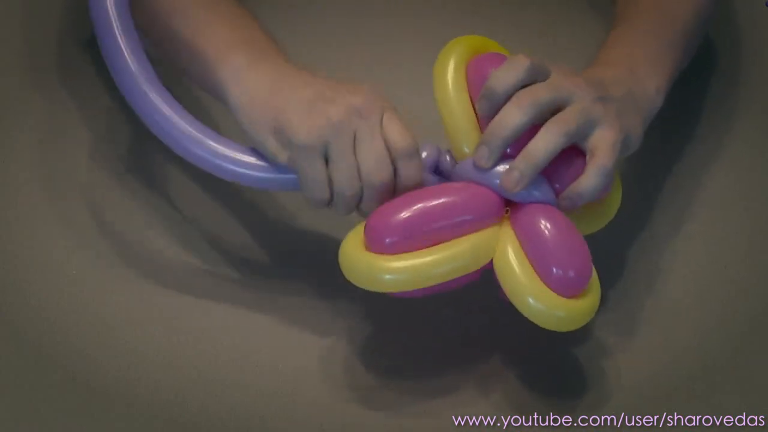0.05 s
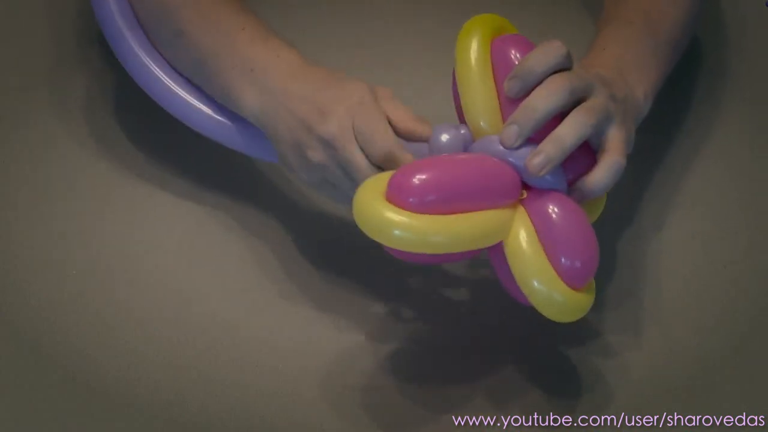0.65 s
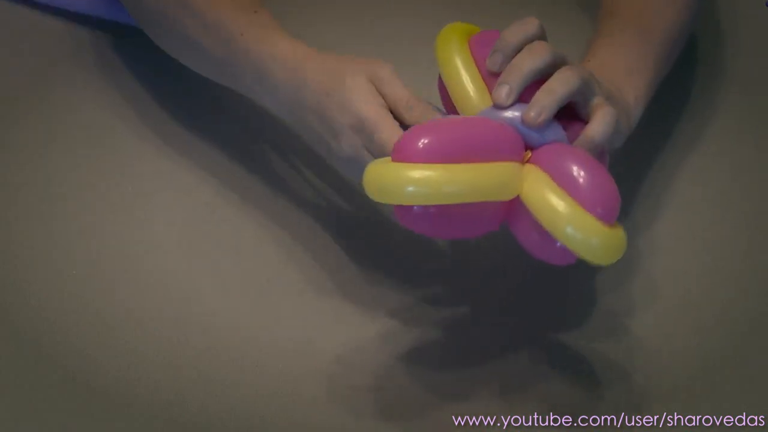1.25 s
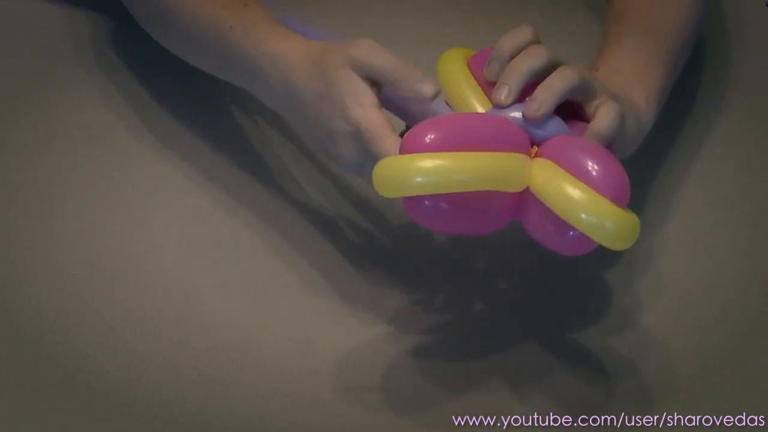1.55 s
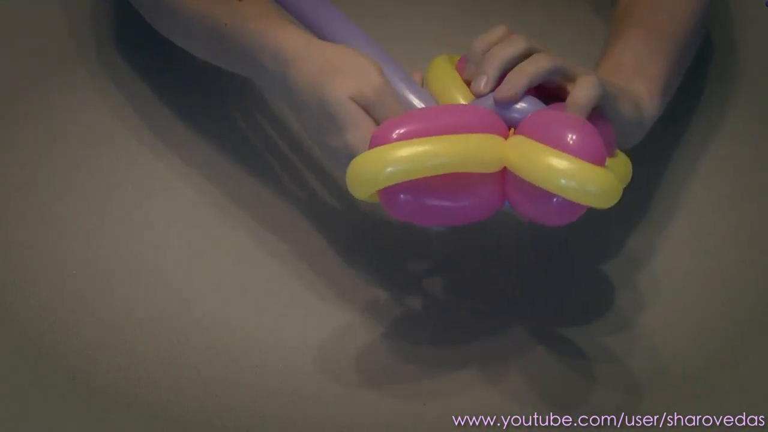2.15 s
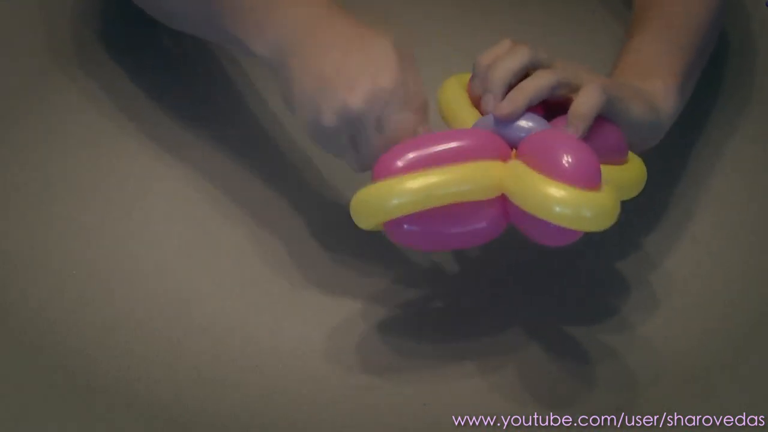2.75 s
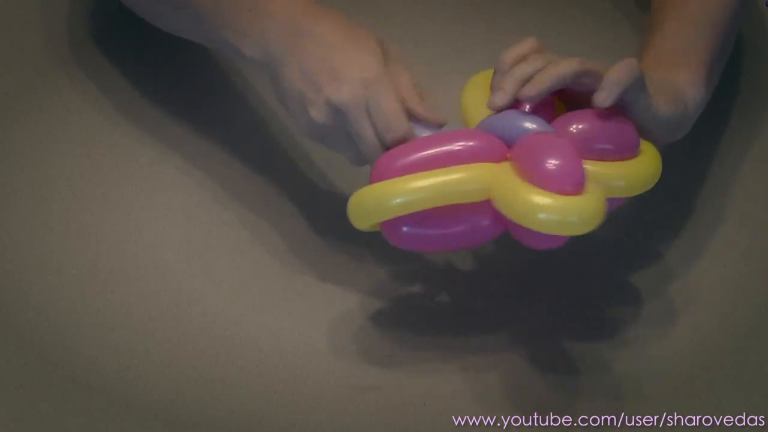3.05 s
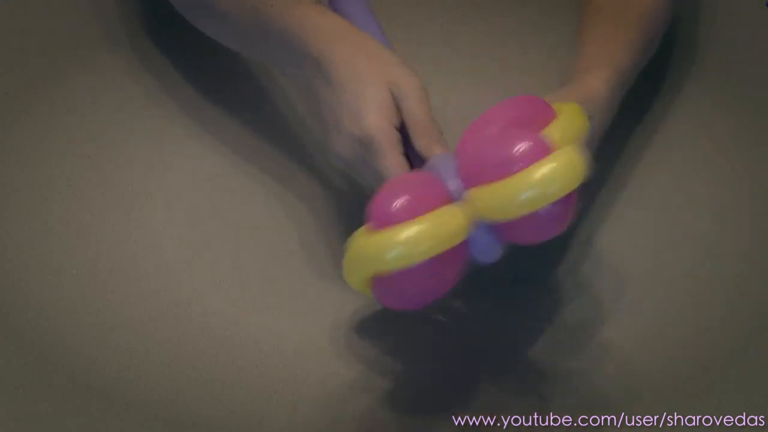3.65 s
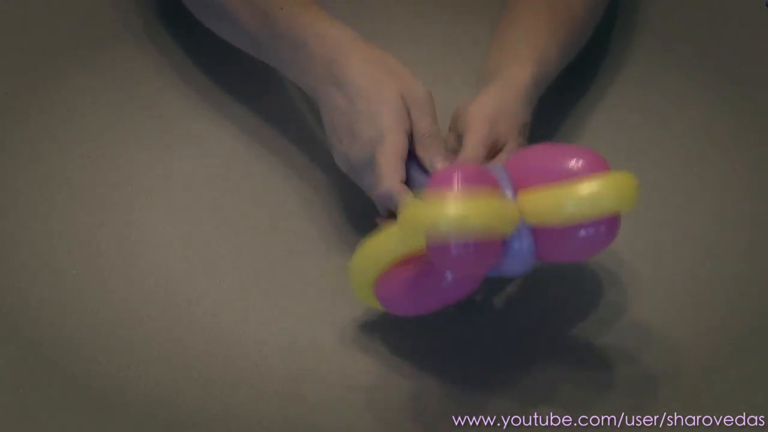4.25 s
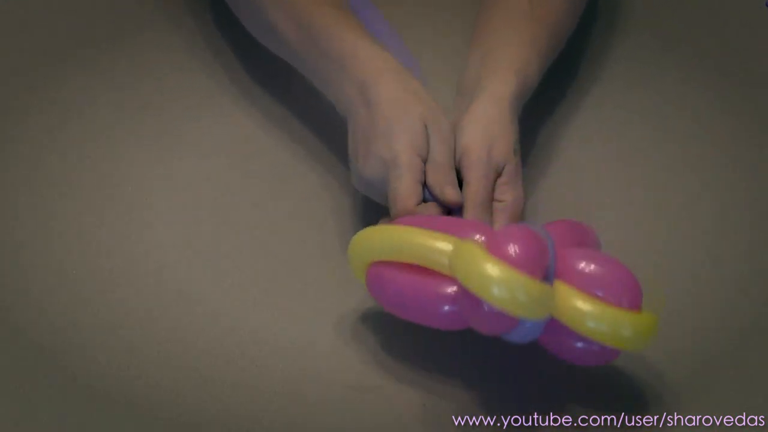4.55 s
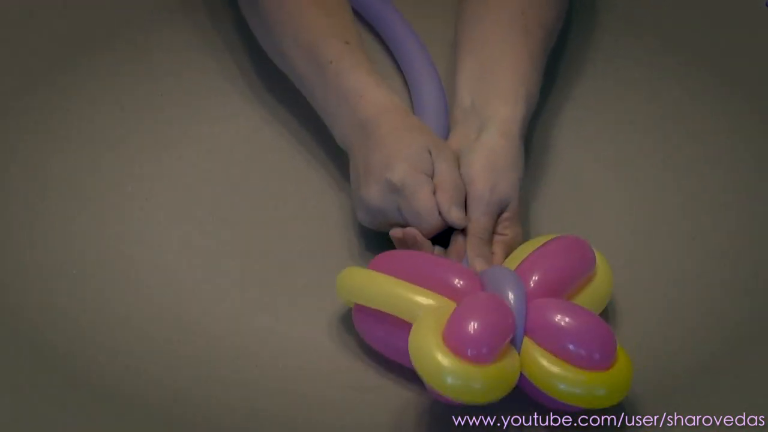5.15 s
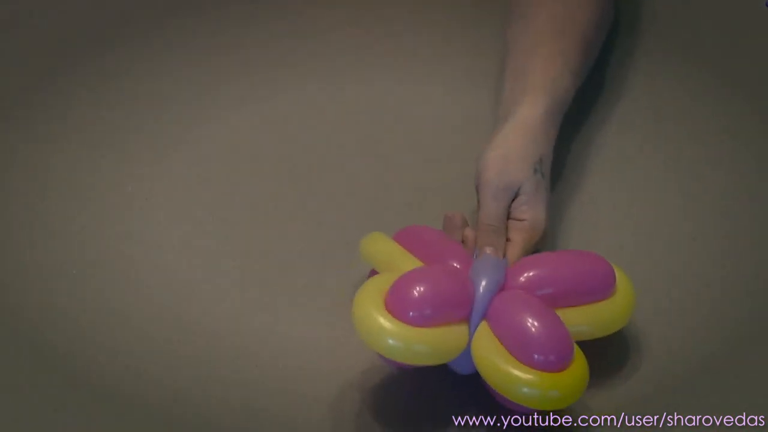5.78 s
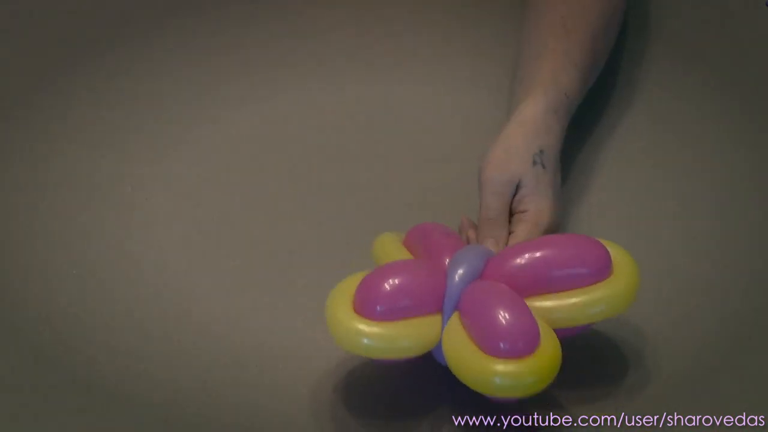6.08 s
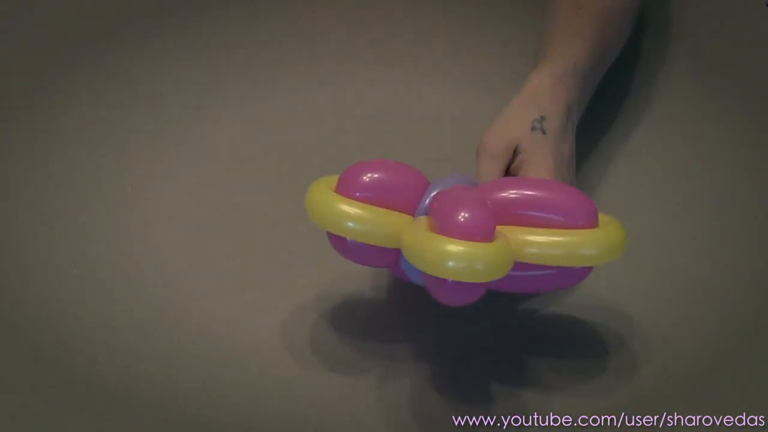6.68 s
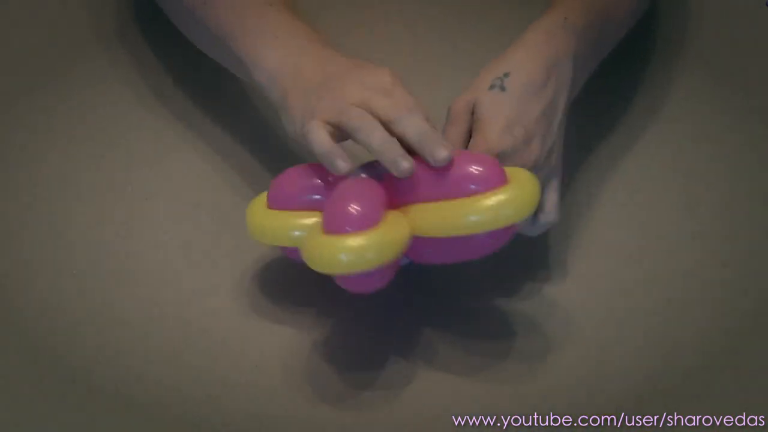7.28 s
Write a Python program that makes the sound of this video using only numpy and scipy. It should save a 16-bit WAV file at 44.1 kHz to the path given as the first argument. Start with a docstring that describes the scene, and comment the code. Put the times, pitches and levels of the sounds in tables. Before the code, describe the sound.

Latex balloons are pressed and twisted together, making a busy, creaky rubbing full of clicks, little squeaks and occasional thumping pops. The handling thins a little, then a loud snapping pop leads into a high, wavering squeal with a rough, grating middle. More rubbing and small snaps finish it. The sound is close, in a small room with a short echo and faint hiss.

```python
"""A small room, close microphone: hands twist a long latex balloon around a balloon figure.
The skins stick and slip: a creaking rub, single snaps, loud pops that thump the air inside.
Fast slips lock to a pitch as short squeaks and high squeals; irregular ones rasp.
A limiter ducks after the loudest pops."""
import sys
import numpy as np
from scipy import signal
from scipy.fft import rfft, irfft, next_fast_len
from scipy.io import wavfile
from scipy.ndimage import uniform_filter1d, map_coordinates

SR = 44100
rng = np.random.default_rng(int(sys.argv[2]) if len(sys.argv) > 2 else 0)


def to_wav(sig):
    """Store sig (one row per channel, or 1-D mono) as 16-bit WAV at the path in sys.argv[1].

    Samples outside -1..1 are clipped; the rate is SR.
    """
    pcm = np.clip(np.atleast_2d(sig), -1, 1) * 32767
    pcm = np.round(pcm).astype(np.int16)
    wavfile.write(sys.argv[1], SR, pcm.T)  # frames by channels


N = 322812
TIME_S = np.arange(N) / SR

# Levels in the tables are relative.
# Room noise spectrum: freq_hz, density_db
ROOM_NOISE_SPECTRUM = [(18, -54), (30, -7.5), (227, 4), (499, -9), (721, -27), (913, -0.5), (1430, -0.5),
                       (1540, -3), (2410, 5), (9970, -11), (16000, -17)]
# Room decay: freq_hz, t60_s
ROOM_DECAY = [(150, 0.38), (2500, 0.33), (12000, 0.33)]
# Taut skin spectrum: freq_hz, density_db
SKIN_SPECTRUM = [(900, -24), (1280, -9), (1440, 5), (1560, -6), (1800, 6), (2300, 5), (2800, 4.5),
                 (3500, 3.5), (4300, 0.5), (5200, -3.5), (6500, -11.5), (9000, -48.5)]
# Contact patch spectrum: freq_hz, density_db
SIZZLE_SPECTRUM = [(3000, -26), (5000, -1.5), (6500, -1), (8300, -3.5), (10200, 0.5), (12500, -10),
                   (16000, -10.5)]
# Resonances of the air inside: freq_hz, width_hz, level_db
AIR_MODES = [(181, 82, -4.5), (242, 60, 1.5), (369, 142, -2.5)]
# Resonances of the balloon bodies: freq_hz, width_hz, level_db
BODY_MODES = [(549, 66, -7), (740, 116, 1.5), (831, 81, 0.5), (1072, 270, -8)]
# Steady grip, keeps the skins rustling: time_s, skin_db, hollow_re_skin_db
GRIP_CURVE = [(0, -32, -1.5), (.36, -37, -2.5), (.73, -36.5, -4), (1.15, -35, -3), (1.42, -30.5, -8.5),
              (1.71, -36, -3), (2.05, -30.5, -7), (2.31, -32, -4.5), (2.45, -49, -2), (2.75, -32, -11),
              (3.38, -42, 7), (3.5, -40, -6.5), (4.15, -37.5, -2), (4.7, -40, -5), (5.15, -40, -6),
              (6.27, -44, -9.5), (6.7, -35.5, -1.5), (7.14, -51, 4.5)]
# Pushes that drag skin over skin: start_s, length_s, skin_db, hollow_re_skin_db, sizzle_re_skin_db
HAND_STROKES = [(0.162, 0.033, -29, -16, -5), (0.216, 0.1, -36.5, 1.5, -2.5),
                (.405, 0.088, -24, -6.5, -2.5), (0.579, 0.078, -31, -6, -3),
                (0.778, 0.047, -21.5, -11, -4.5), (0.945, 0.033, -22.5, -10, -5),
                (1.018, 0.077, -31.5, 0, -2), (1.198, 0.11, -29, -4, -3), (1.305, 0.06, -23.5, -10, -2),
                (1.532, .035, -23.5, -10, -10), (1.61, 0.08, -36, -6, -15), (1.746, 0.078, -22, -8.5, -5),
                (1.857, 0.036, -27.5, -8, -2), (1.907, 0.13, -26.5, -1.5, -1.5),
                (2.035, 0.025, -22, -8, -7), (2.096, .08, -35, -17, 6), (2.19, 0.043, -25.5, -3.5, -6),
                (2.264, .03, -24, -12, -11), (2.529, 0.019, -32, -6, -10),
                (2.612, 0.091, -29.5, -1.5, -5.5), (2.691, 0.088, -26.5, -12, -4),
                (2.774, 0.032, -26, -11, -3.5), (2.93, 0.02, -24.5, -6, -6), (3.04, 0.037, -32.5, -1, -7),
                (3.102, 0.024, -22.5, -12, -6), (3.169, 0.045, -29, -1, -8),
                (3.216, 0.048, -19.5, -7.5, -8), (3.28, 0.042, -30, -9, -1.5),
                (3.339, .05, -23.5, -1.5, -4), (3.518, .03, -31, -9.5, -9), (3.589, 0.022, -33, -27, -1.5),
                (3.744, 0.017, -16.5, -12, -9), (3.863, 0.07, -30.5, -5, -9.5),
                (3.992, 0.012, -28.5, 3, -4.5), (4.052, 0.014, -31, 1.5, -1),
                (4.223, 0.068, -30.5, -12, -6), (4.36, 0.016, -30, -27, -2), (4.449, 0.033, -19, -19, -4.5),
                (4.527, 0.048, -31, -25, -11), (4.835, 0.057, -32.5, -8, -13),
                (4.895, 0.047, -28.5, -2.5, -9), (6.159, 0.018, -26, -15, -3), (6.32, 0.088, -34, -7, -3),
                (6.422, 0.049, -32.5, -6, -6), (6.578, 0.13, -28, -5, 1.5), (6.753, 0.059, -27, -4, 3),
                (6.808, 0.12, -26, -7.5, 2), (6.974, .04, -35, -5, -0.5), (7.157, .02, -33.5, -16, -9.5),
                (7.225, .03, -29, -4, -8.5), (7.275, 0.054, -37.5, -0.5, -3.5)]
# One hard wrap, slowing as it seats: time_s, level_db, slip_rate_hz
CREAK_CURVE = [(4.451, -45, 520), (4.458, -13, 520), (4.487, -18.5, 400), (4.515, -16, 310),
               (4.538, -29, 226), (4.565, -21.5, 180), (4.6, -36, 160)]
# Spectrum of the creaking stretch of skin: freq_hz, density_db
CREAK_SKIN_SPECTRUM = [(900, -49), (1400, -15), (1800, -2), (2800, 2), (3500, 1.5), (4100, -21),
                       (5500, -15), (7500, -27), (10000, -13.5), (16000, -42)]
# Spectrum of the air shaken by the creak: freq_hz, density_db
CREAK_AIR_SPECTRUM = [(30, 0), (110, 5), (220, -10), (400, -28), (1200, -57)]
# Grating of the tight twist between squeals: start_s, length_s, level_db
RASP_STROKES = [(5.471, 0.018, -23.5), (5.503, 0.14, -31), (5.52, 0.037, -17.5), (5.561, 0.035, -24),
                (5.665, 0.087, -20.5), (5.763, 0.094, -22), (5.806, 0.085, -21)]
# Rasp spectrum: freq_hz, density_db
RASP_SPECTRUM = [(1100, -39), (1550, -22), (1850, -2.5), (2400, 1.5), (3200, -5.5), (4000, -1),
                 (4800, -9.5), (6000, -7.5), (8000, -14.5), (11000, -17.5), (16000, -23)]
# Short squeaks and low groans: start_s, length_s, first_hz, last_hz, level_db, roughness
SQUEAK_GLIDES = [(0.419, 0.035, 2920, 2680, -20, 0.4), (0.46, 0.023, 2710, 2670, -18.5, 0.45),
                 (0.826, 0.018, 2340, 2370, -18.5, 0.6), (1.199, 0.021, 1950, 1880, -23.5, 0.7),
                 (2.225, 0.015, 2946, 2690, -20.5, 0.7), (2.79, 0.066, 344, 346, -36.5, 0.3),
                 (2.934, 0.025, 5770, 5700, -24, 0.44), (3.373, 0.0079, 3090, 2880, -24, 0.5),
                 (3.529, 0.031, 2695, 2546, -30.5, 0.59), (3.753, 0.026, 1972, 2143, -18, 0.38),
                 (5.526, 0.038, 3320, 3185, -20, 0.7), (5.568, 0.062, 1903, 2070, -23, 0.17),
                 (5.654, 0.031, 7800, 6100, -25.5, 0.39), (5.68, 0.0124, 2443, 2260, -13, 0.75),
                 (5.691, 0.096, 2066, 1940, -23, 0.77), (5.692, 0.055, 3930, 3850, -25, 0.24),
                 (5.699, 0.084, 800, 794, -34, 0.6), (5.827, 0.059, 2500, 2666, -28.5, 1.01),
                 (6.586, 0.076, 277, 247, -33.5, .8), (6.758, 0.064, 226.5, 283, -29, 1.23)]
# Two long squeals, one list each: time_s, pitch_hz, fundamental_db, overtones_db, roughness
SQUEAL_CURVES = [
    [(5.28, 3290, -57, -44, 0.08), (5.325, 3300, -44, -26.5, 0.08), (5.365, 3420, -34, -27, 0.1),
     (5.382, 3430, -18, -23, .02), (5.41, 3413, -20, -26, 0.07), (5.435, 3424, -15, -20, 0.01),
     (5.455, 3180, -23, -21.5, .1), (5.473, 2916, -16, -22, 0.3), (5.488, 2890, -36, -32, 0.44)],
    [(5.845, 2906, -21, -42, 0.44), (5.87, 2710, -31, -21.5, 0.02), (5.895, 2690, -36, -25.5, 0.14),
     (5.95, 2663, -39, -37, 0.14), (6.07, 2720, -60, -52, .06)],
]
# Overtones, one list per squeal: level_db from the second harmonic up
SQUEAL_OVERTONES_DB = [
    [0, -5, -5],
    [1.5, -5.5, 0, -9],
]
# Single slips: start_s, kick_db, body_re_kick_db, sizzle_re_kick_db
SNAP_EVENTS = [(0.1742, -7.5, -5, -15), (.2627, -16, -3, 8.5), (.425, -8, -24, -14), (.5905, -15, -14, -2),
               (.7212, -24, -6, 5), (.7728, -11.5, -5, 5), (0.7894, -9, -2.5, 0), (0.7981, -3, -15, -3.5),
               (0.8236, 0, -10.5, -10), (0.8992, -4.5, -12.5, -4.5), (0.9539, -10, -13, -5),
               (1.0271, -10.5, -22, 4), (1.0382, -9, -5.5, -1), (1.085, -10.5, -7.5, 2),
               (1.1819, -9.5, -11, -3), (1.2064, -7, -12.5, -1.5), (1.2365, -10, -16, -10.5),
               (1.3022, -5.5, -4, -3), (1.3152, -11, -14, 2), (1.3332, -9, -20, 3), (1.5526, -12, -15, -17),
               (1.9241, -3, -14, -2), (2.2322, -5, -5, -14), (2.5376, -22, -9, -9), (2.6335, -13, -16, -8),
               (2.741, -0.5, -15, -16), (2.855, -4, -13.5, -2.5), (2.859, -6.5, -10, -7),
               (3.052, -5, -6, -3.5), (3.213, -9, -3, -3), (3.2489, -6.5, -3.5, -3.5),
               (3.2652, -4.5, -16, -5), (3.7506, -13, -1.5, -10), (4.0703, -10, -12, -0.5),
               (4.2377, -0.5, -9.5, -5.5), (4.275, -6.5, -25, -19), (4.281, -8, -27, -9),
               (4.554, -7.5, -30, -22), (4.5606, -7, -33, -19), (4.8575, -13, -28, -14),
               (5.6843, -1.5, -37, -22), (6.1688, -3.5, -14, -5.5), (6.176, -7.5, -20, -8),
               (6.4685, -22, -14, 8), (6.4969, -1, -14.5, -7), (6.7487, -10.5, -14, 4),
               (6.831, -5.5, -17, -14), (6.8957, -7.5, -8, -6), (6.9865, -13.5, -17, -2),
               (7.074, -18.5, -3.5, -5), (7.2768, -11, -28, -7)]
# A bubble jumps past its neighbour: start_s, crack_db, ring_hz, t60_s, thump_db, thump_hz, thump_delay_s
POP_EVENTS = [(0.4965, -8, 3080, 0.018, -1, 213, 0.00049), (1.4789, -6, 2870, .018, -2, 187, .0012),
              (2.1195, -11.5, 3520, 0.017, -13.5, 185, 0.0019),
              (2.7186, -2.5, 2780, 0.0069, -6.5, 170, 0.0014), (2.9343, -17, 1950, 0.12, -1, 162, 0.009),
              (5.2125, 10, 2940, 0.018, 4, 110, 0.0037)]

ATTACK_S, SAG_DB_PER_S, RELEASE_DB_PER_S = 0.013, 7, 333
SMALL_SNAPS_PER_S, SMALL_SNAP_DB, SMALL_SNAP_SPREAD_DB = 16, 14.5, 4.5
THUMP_RISE_S, THUMP_T60_S = 0.00069, 0.015
HIGHPASS_HZ, TOP_HZ = 45, 16000


def amp(db):
    """Decibels to gain."""
    return 10 ** (np.asarray(db) / 20)


def unit(x):
    """x at rms 1."""
    return x / np.sqrt(np.mean(x ** 2) + 1e-20)


def along(points, hz):
    """(freq_hz, value) points read on a log axis."""
    knots_hz, values = np.transpose(points)
    return np.interp(np.log(hz + 1), np.log(knots_hz + 1), values)


def curves(rows, t):
    """Each column after time_s, read at the times t."""
    time_s, *columns = np.transpose(rows)
    return [np.interp(t, time_s, column) for column in columns]


def wobble(rate_hz, size):
    """Smooth random curve, rate_hz knots a second."""
    knots = rng.standard_normal(int(size * rate_hz / SR) + 4)
    return map_coordinates(knots, [np.arange(size) * rate_hz / SR])


def add(track, start_s, x):
    """Mix x into the track."""
    part = track[max(round(start_s * SR), 0):][:len(x)]
    part += x[:len(part)]


def filtered(x, response):
    """x through a frequency response."""
    size = next_fast_len(len(x) + 8192)
    return irfft(rfft(x, size) * response(np.fft.rfftfreq(size, 1 / SR)), size)[:len(x)]


def convolve(x, impulse):
    """x through an impulse response, cut to N samples."""
    return signal.fftconvolve(x, impulse)[:N]


def minimum_phase(spectrum, size=2048):
    """Shortest impulse response with this spectrum; energy 1."""
    magnitude = amp(along(spectrum, np.fft.rfftfreq(size, 1 / SR)))
    cepstrum = irfft(np.log(magnitude + 1e-6))
    cepstrum[1:size // 2] *= 2
    cepstrum[size // 2 + 1:] = 0
    impulse = irfft(np.exp(rfft(cepstrum)))
    return impulse / np.linalg.norm(impulse)


def resonator(modes, size=2048):
    """Impulse response of damped resonances; energy 1."""
    t = np.arange(size) / SR
    impulse = sum((-1) ** k * amp(db) * width_hz * np.exp(-np.pi * width_hz * t)
                  * np.cos(2 * np.pi * hz * t) for k, (hz, width_hz, db) in enumerate(modes))
    return impulse / np.linalg.norm(impulse)


def room_noise():
    """Steady hiss and hum of shaped noise; rms 1."""
    return unit(filtered(rng.standard_normal(N), lambda hz: amp(along(ROOM_NOISE_SPECTRUM, hz))))


def room_echo(x):
    """The walls answer after a few milliseconds; the bass lasts longest."""
    hz, t, noise = signal.stft(rng.standard_normal(SR // 2), SR, nperseg=256)
    decay = amp(-60 * t / along(ROOM_DECAY, hz)[:, None])
    tail = signal.istft(noise * decay, SR, nperseg=256)[1]
    return convolve(np.pad(x, (SR // 150, 0)), tail / np.linalg.norm(tail))


def balloon(skin, air, body, sizzle):
    """Slips sound through the taut skin, the air inside, the bodies and the thin contact patch."""
    return (convolve(skin, minimum_phase(SKIN_SPECTRUM))
            + convolve(air, resonator(AIR_MODES))
            + convolve(body, resonator(BODY_MODES))
            + convolve(sizzle, minimum_phase(SIZZLE_SPECTRUM)))


def ripple(t60_s, scatter, size=2048):
    """One slip: a kick, then waves that scatter round the skin and die; energy 1."""
    impulse = scatter * rng.standard_normal(size) * amp(-60 * np.arange(size) / SR / t60_s)
    impulse[0] += 1
    return impulse / np.linalg.norm(impulse)


def slips(rate_hz, wander, jitter, spread_db, paths=7):
    """One contact sticks and slips unevenly; its waves take changing paths over the skin."""
    uneven_hz = rate_hz * np.exp(wander * wobble(14, N) + jitter * wobble(250, N))
    onsets = np.flatnonzero(np.diff(np.floor(np.cumsum(uneven_hz) / SR)))
    kicks = np.zeros(N)
    kicks[onsets] = amp(spread_db * np.clip(rng.standard_normal(len(onsets)), -2, 2))
    return unit(sum(wobble(20, N) * convolve(kicks, ripple(t60_s=0.015, scatter=0.2))
                    for _ in range(paths)))


def steady(push, window_samples):
    """The hands set the mean force, however the slips fall."""
    return push / np.sqrt(np.abs(uniform_filter1d(push ** 2, size=window_samples)) + 1e-4)


def retension(x, depth_db):
    """The skin's resonances shift as the grip changes its tension."""
    spectra = signal.stft(x, nperseg=256)[2]
    field = uniform_filter1d(rng.standard_normal(spectra.shape), size=2, axis=0)
    field = uniform_filter1d(field, size=12, axis=1)
    gain = unit(amp(depth_db * np.clip(unit(field), -2, 2)))
    return signal.istft(spectra * gain, nperseg=256)[1][:N]


def stroke(start_s, length_s):
    """Gain of one stroke: quick attack, sagging hold, release."""
    t = np.maximum(TIME_S - start_s, 0)
    fall_db = SAG_DB_PER_S * t + RELEASE_DB_PER_S * np.clip(t - length_s, 0, 1)
    return np.minimum(t / ATTACK_S, 1) * amp(-fall_db)


def effort():
    """Grip and strokes add in power: gains of the skin, the hollow inside and the contact patch."""
    grip_db, grip_hollow_db = curves(GRIP_CURVE, TIME_S)
    power = amp([grip_db, grip_db + grip_hollow_db, grip_db - 4.5]) ** 2
    for start_s, length_s, skin_db, hollow_db, sizzle_db in HAND_STROKES:
        gains = amp([skin_db, skin_db + hollow_db, skin_db + sizzle_db])
        power += np.outer(gains ** 2, stroke(start_s, length_s) ** 2)
    return np.sqrt(power)


def small_snaps():
    """Small patches let go at random moments."""
    count = int(SMALL_SNAPS_PER_S * N / SR)
    levels_db = SMALL_SNAP_DB + SMALL_SNAP_SPREAD_DB * np.clip(rng.standard_normal(count), -2, 2)
    kicks = np.zeros(N)
    kicks[(rng.random(count) * N).astype(int)] = amp(levels_db)
    return convolve(kicks, ripple(t60_s=0.039, scatter=0.44))


def rubbing():
    """Slow and fast contacts take turns as the hands press and turn the balloons."""
    skin_gain, hollow_gain, sizzle_gain = effort()
    contacts = [slips(rate_hz, wander=0.45, jitter=0.35, spread_db=2.0)
                for rate_hz in (94.15, 198.9, 339.8, 597.7)]
    ticks = small_snaps()
    friction = sum(contact * amp(2.46 * wobble(11, N)) for contact in contacts)
    push = steady(friction, window_samples=900) * amp(-0.5) + ticks
    skin = retension(push * skin_gain, depth_db=3.1)
    sparkle = steady(slips(rate_hz=75, wander=0.36, jitter=0.55, spread_db=3.0), window_samples=2400)
    sizzle = (0.8 * push + 0.6 * (sparkle + ticks)) * sizzle_gain * amp(-0.06)
    hollow = push * hollow_gain
    return balloon(skin, air=hollow * amp(-4), body=hollow * amp(-2.5), sizzle=sizzle)


def creak():
    """A slowing run of hard slips rings one taut stretch of skin and bumps the air inside."""
    level_db, rate_hz = curves(CREAK_CURVE, TIME_S)
    push = steady(slips(rate_hz, wander=0.086, jitter=0.22, spread_db=0.0), window_samples=600)
    gate = (TIME_S > CREAK_CURVE[0][0]) * (TIME_S < CREAK_CURVE[-1][0])
    impulse = minimum_phase(CREAK_SKIN_SPECTRUM) + amp(-22) * minimum_phase(CREAK_AIR_SPECTRUM)
    return convolve(push * amp(level_db) * gate, impulse)


def rasp():
    """Stick-slip too fast and irregular to hold a pitch."""
    power = sum((amp(db) * stroke(start_s, length_s)) ** 2 for start_s, length_s, db in RASP_STROKES)
    push = steady(slips(rate_hz=1900, wander=0.15, jitter=0.22, spread_db=6.5), window_samples=500)
    grating = convolve(retension(push, depth_db=3.0), minimum_phase(RASP_SPECTRUM))
    return np.sqrt(power) * unit(grating)


def slip_phase(pitch_hz, roughness):
    """Fast stick-slip locks to a pitch; roughness shakes its period."""
    shaken_hz = pitch_hz * (1 + roughness * 0.133 * wobble(1100, len(pitch_hz)))
    return 2 * np.pi * np.cumsum(shaken_hz) / SR


def overtones(phase, pitch_hz, levels_db):
    """Harmonics from the second up, below Nyquist."""
    return sum(amp(db) * np.sin(k * phase) * (k * pitch_hz < SR / 2)
               for k, db in enumerate(levels_db, 2))


def squeaks():
    """Short stick-slip glides; the rough ones flutter in level."""
    out = np.zeros(N)
    for start_s, length_s, first_hz, last_hz, level_db, roughness in SQUEAK_GLIDES:
        size = int(length_s * SR)
        pitch_hz = np.linspace(first_hz, last_hz, size)
        phase = slip_phase(pitch_hz, roughness)
        tone = np.sin(phase) + overtones(phase, pitch_hz, levels_db=[-12.5, -13.5, -20.5, -28])
        flutter = amp(2.0 * roughness * wobble(430, size))
        add(out, start_s, amp(level_db) * unit(tone * flutter * signal.windows.tukey(size, 0.4)))
    return out


def squeals():
    """Tight latex drawn over latex sings, rough at times as the pitch sags."""
    out = np.zeros(N)
    for rows, levels_db in zip(SQUEAL_CURVES, SQUEAL_OVERTONES_DB):
        t = np.arange(rows[0][0], rows[-1][0], 1 / SR)
        pitch_hz, fundamental_db, overtones_db, roughness = curves(rows, t)
        phase = slip_phase(uniform_filter1d(pitch_hz, size=900), roughness)
        fundamental = amp(fundamental_db) * unit(np.sin(phase))
        upper = amp(overtones_db) * unit(overtones(phase, pitch_hz, levels_db))
        flutter = amp(4 * roughness * np.tanh(wobble(386, len(t))))
        add(out, t[0], (fundamental + upper) * flutter)
    return out


def snaps(nudge_hz=90, nudge_t60_s=0.012):
    """A stuck patch lets go all at once and nudges the air inside."""
    skin, body, sizzle, nudge = np.zeros((4, N))
    t = np.arange(SR // 20) / SR
    swing = amp(-24 - 60 * t / nudge_t60_s) * np.sin(2 * np.pi * nudge_hz * t)
    for start_s, kick_db, body_db, sizzle_db in SNAP_EVENTS:
        release = ripple(t60_s=0.013, scatter=0.22)
        ring = ripple(t60_s=0.068, scatter=1)
        kick = amp(kick_db + 7.5) * (release + 0.91 * ring)
        add(skin, start_s, kick)
        add(body, start_s, kick * amp(body_db + 2.5))
        add(sizzle, start_s, kick * amp(sizzle_db - 0.5))
        add(nudge, start_s, amp(kick_db) * swing)
    return balloon(skin, air=body * amp(-6.5), body=body, sizzle=sizzle) + nudge


def pops(size=4096):
    """A crack with two brief modes of the skin, then one heavy swing of the air inside."""
    out, t = np.zeros(N), np.arange(size) / SR
    crack_hz_db = [(300, -5), (1100, 4.5), (1800, 2.0), (3000, 4.5), (9000, 3.0), (16000, -7.0)]
    for start_s, crack_db, ring_hz, t60_s, thump_db, thump_hz, thump_delay_s in POP_EVENTS:
        crack = filtered(rng.standard_normal(size), lambda hz: amp(along(crack_hz_db, hz)))
        phase = 2 * np.pi * np.cumsum(ring_hz * (1 + 0.036 * wobble(1100, size))) / SR
        ring = np.sin(phase) + 0.74 * np.sin(1.4 * phase)
        add(out, start_s, amp(crack_db - 60 * t / t60_s) * (unit(crack) + 0.9 * ring))
        thump_gain = amp(thump_db - 60 * t / THUMP_T60_S) * (1 - np.exp(-t / THUMP_RISE_S))
        add(out, start_s + thump_delay_s, thump_gain * np.sin(2 * np.pi * thump_hz * t))
    return out


def scene():
    """Balloon sounds, their echo and the room noise; mono."""
    rub = rubbing() + creak()
    snap, pop = snaps(), pops()
    squeak = squeaks() + rasp()
    squeal = squeals()
    echo = room_echo(amp(-9.5) * rub + amp(-7.5) * snap + amp(-32.5) * pop
                     + amp(-8) * squeak + amp(-5) * squeal)
    return (amp(-44) * room_noise() + echo + rub + squeak + squeal + snap + pop)[None]


def limiter(x, ceiling_db, release_db_per_s):
    """Peaks pull the gain down at once; it recovers at a steady rate."""
    over_db = np.maximum(20 * np.log10(np.abs(x) + 1e-9) - ceiling_db, 0)
    recovery_db = release_db_per_s * TIME_S
    duck_db = np.maximum.accumulate(over_db + recovery_db) - recovery_db
    return x * amp(-duck_db)


def record(dry):
    """The microphone thins the deep bass; the recorder limits, rounds peaks and cuts the top."""
    x = signal.sosfilt(signal.butter(1, HIGHPASS_HZ, "high", fs=SR, output="sos"), dry[0])
    x = limiter(x, ceiling_db=6, release_db_per_s=145)
    x = x / (1 + (np.abs(x) / 0.72) ** 6) ** (1 / 6)  # soft clip
    return filtered(x, lambda hz: hz < TOP_HZ)[None]


dry = scene()
out = record(dry)
to_wav(out)
```